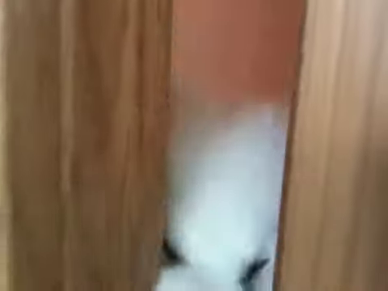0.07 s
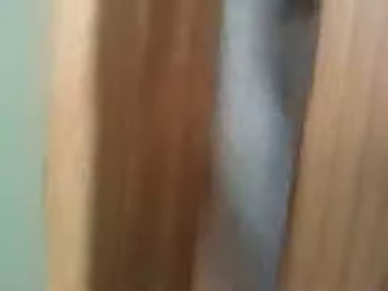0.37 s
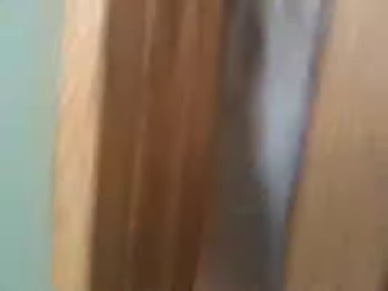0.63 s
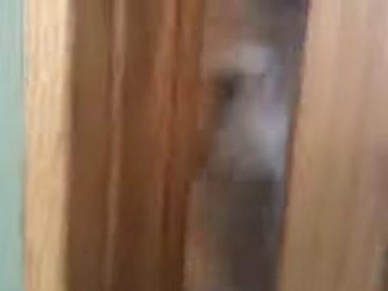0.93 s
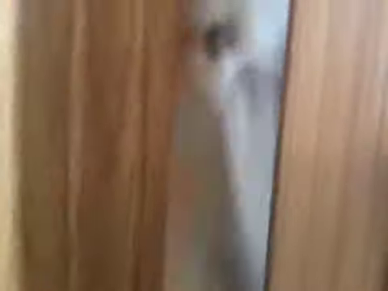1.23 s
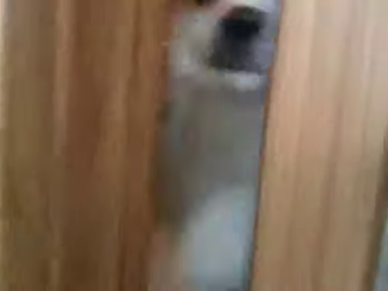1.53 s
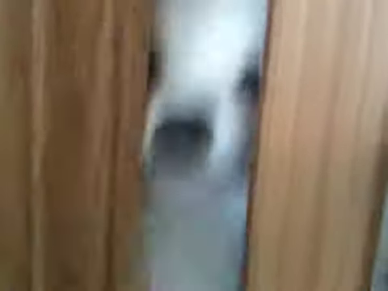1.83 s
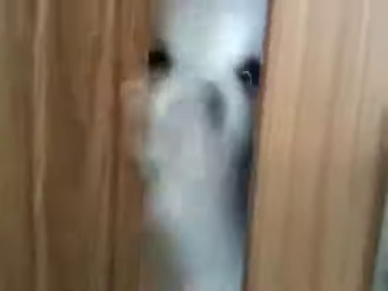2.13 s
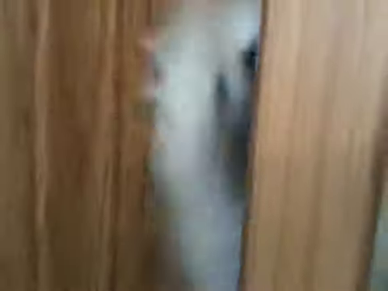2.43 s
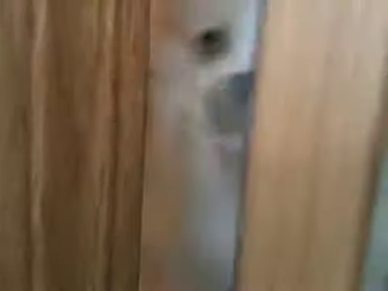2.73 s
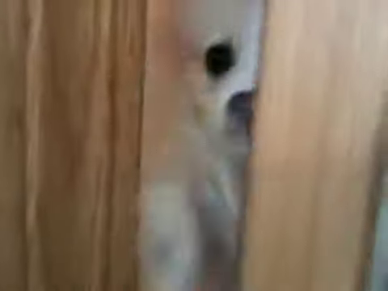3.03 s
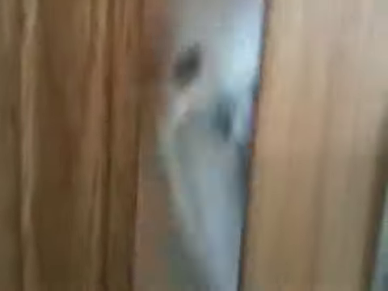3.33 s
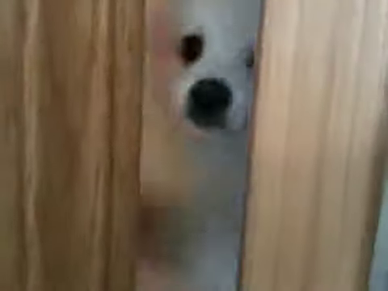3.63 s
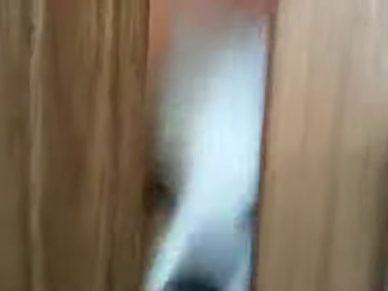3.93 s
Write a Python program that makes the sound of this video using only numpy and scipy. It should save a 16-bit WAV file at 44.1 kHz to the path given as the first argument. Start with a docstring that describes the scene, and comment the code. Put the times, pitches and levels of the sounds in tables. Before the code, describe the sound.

Close by in a quiet room, a puppy's claws scratch a wooden door over a soft shuffle of fur. Hollow paw knocks and thin, warbling whimpers join in and grow louder, ending with a hard knock and dull bumps.

```python
"""A small quiet room, one microphone close to a puppy scrabbling between two wooden door panels.
Over a shuffle of fur and paws, claws first scrape and tick on the wood, then paws start to knock the
panel. From about 0.6 s the puppy gives short, thin, warbling whines between strokes. Knocks and whines
grow louder towards the middle; now and then a claw squeals or the body bumps the door. Late on the
whines turn lower and fainter, and the hardest knock and two bumps come just before the end at 4 s."""
import sys
import numpy as np
from scipy import signal
from scipy.fft import rfft, irfft, next_fast_len
from scipy.io import wavfile
from scipy.ndimage import uniform_filter1d, map_coordinates

SR = 44100
rng = np.random.default_rng(int(sys.argv[2]) if len(sys.argv) > 2 else 0)


def to_wav(sig):
    """Store sig (one row per channel, or 1-D mono) as 16-bit WAV at the path in sys.argv[1].

    Samples outside -1..1 are clipped; the rate is SR.
    """
    pcm = np.clip(np.atleast_2d(sig), -1, 1) * 32767
    pcm = np.round(pcm).astype(np.int16)
    wavfile.write(sys.argv[1], SR, pcm.T)  # frames by channels


N = 176400
T = np.arange(N) / SR

# resonances of the door panel: centre_hz, width_hz, scraped_db, struck_db
PANEL_MODES = [(498, 37, -6, -23), (753, 113, -2.5, -4.5), (1290, 186, -15.5, -8), (1740, 260, -2, 0.5),
               (2178, 113, -1, -7.5), (2780, 270, -2, -8), (3543, 204, -0.5, -11), (4160, 320, 1.5, -9),
               (6870, 1200, -7, -17), (7580, 490, -2.5, -22), (10730, 690, -8, -18)]
# broad spectrum of a claw on wood: frequency_hz, level_db
CLAW_COLOUR = [(60, -62), (200, -17), (1000, -9), (3000, -6), (5300, -6.5), (7000, -6), (12600, -9.5),
               (15000, -17), (16000, -35)]


def amp(db):
    """Decibels to gain."""
    return 10 ** (np.asarray(db) / 20)


def unit(x):
    """Scale to rms 1."""
    return x / np.sqrt(np.mean(x ** 2) + 1e-20)


def along(points, hz):
    """Read (frequency_hz, value) points on a log frequency axis."""
    point_hz, values = np.transpose(points)
    return np.interp(np.log(hz + 1), np.log(point_hz + 1), values)


def wobble(rate):
    """A smooth random curve, rate knots a second."""
    return map_coordinates(rng.standard_normal(int(N * rate / SR) + 4), [T * rate])


def filtered(x, response):
    """Filter x by a gain given as a function of frequency."""
    size = next_fast_len(N + SR // 2)
    return irfft(rfft(x, size) * response(np.fft.rfftfreq(size, 1 / SR)), size)[:N]


def noise(colour):
    """Coloured noise of rms 1."""
    return unit(filtered(rng.standard_normal(N), lambda hz: amp(along(colour, hz))))


def add(out, start_s, x):
    """Mix x into out from start_s."""
    i = max(round(start_s * SR), 0)
    out[i:i + len(x)] += x[:max(N - i, 0)]


def grit(count, smooth, slips_per_s=3600):
    """Friction force of rms 1: tiny slips of random size over a smooth rub."""
    slips = (rng.random(count) < slips_per_s / SR) * rng.standard_normal(count)
    return unit(unit(slips) + smooth * rng.standard_normal(count))


def catches(x, depth_db):
    """Each brief catch of a claw stresses its own narrow bands, so the colour keeps shifting."""
    spectrum = signal.stft(x, SR, nperseg=256)[2]
    stress = uniform_filter1d(rng.standard_normal(spectrum.shape), size=3, axis=0)
    stress = unit(uniform_filter1d(stress, size=5, axis=1))
    gain = amp(depth_db * np.clip(stress, -2, 2))
    return signal.istft(spectrum * unit(gain), SR, nperseg=256)[1][:N]


def panel_ring(colour, spot_db, tilt_db=0, struck=False, size=2048):
    """The panel's impulse response, energy 1; each spot of contact weights the resonances anew."""
    hz = np.fft.rfftfreq(size, 1 / SR)
    power = amp(along(colour, hz)) ** 2
    for centre_hz, width_hz, scraped_db, struck_db in PANEL_MODES:
        mode_db = (struck_db if struck else scraped_db) + spot_db * rng.standard_normal()
        power += amp(mode_db) ** 2 / (1 + ((hz - centre_hz) / width_hz) ** 2) ** 2
    gain = np.sqrt(power) * amp(tilt_db * np.log2(1 + hz / 2500))
    # minimum phase: the ring starts at the contact
    cepstrum = irfft(np.log(gain + 1e-6))
    cepstrum[1:size // 2] *= 2
    cepstrum[size // 2 + 1:] = 0
    ring = irfft(np.exp(rfft(cepstrum)))
    return ring / np.linalg.norm(ring)


def room_tail(x):
    """The small room answers 5 ms later with a short diffuse tail whose treble dies first."""
    hz, t, spectrum = signal.stft(rng.standard_normal(SR // 2), SR, nperseg=256)
    t60_s = along([(1500, 0.48), (5000, 0.23), (14000, 0.17)], hz)
    tail = signal.istft(spectrum * amp(-60 * t / t60_s[:, None]), SR, nperseg=256)[1]
    return signal.fftconvolve(x, np.pad(tail, (SR // 200, 0)) / np.linalg.norm(tail))[:N]


def shuffle():
    """Restless fur and paws under everything."""
    # paws on the floor and the still room: frequency_hz, level_db
    colour = [(25, -26), (85, -14), (125, -3.5), (220, 2), (380, -7), (700, -8.5), (1100, -10), (4000, -9),
              (8000, -13), (16000, -24.5)]
    # rise and fall of the shuffling: time_s, level_db
    contour = [(0, -51), (.17, -62), (.31, -61.5), (.37, -56), (.42, -54), (1.02, -58), (2.25, -52),
               (3.08, -56), (3.4, -55), (3.78, -56.5), (4, -45.5)]
    rustle = catches(noise(colour), depth_db=3.5)
    return rustle * amp(np.interp(T, *np.transpose(contour)) + 3.0 * wobble(35.13))


def body_bumps(attack_s=0.00082, t60_s=0.24):
    """The body bumps the door with soft, dull thuds."""
    # thuds of the door: start_s, level_db
    thuds = [(0.788, -49), (1.69, -48.5), (2.196, -39), (2.229, -46.5), (3.938, -45), (3.973, -41)]
    # spectrum of a thud: frequency_hz, level_db
    colour = [(30, -35), (90, -30), (130, -8), (235, 2.5), (350, -6.5), (5000, -44)]
    envelope = np.zeros(N)
    for start_s, level_db in thuds:
        age = np.maximum(T - start_s, 0)
        envelope += amp(level_db - 60 * age / t60_s) * (1 - np.exp(-age / attack_s))
    return noise(colour) * envelope


def claw_squeals(half_length_s=0.0043, wander=0.018):
    """Stick and slip locks for a moment onto one unsteady note."""
    # a claw sticks: centre_s, pitch_hz, level_db
    squeals = [(.54, 4180, -35.5), (.902, 6160, -39), (2.092, 3880, -30.5), (2.342, 3790, -36),
               (2.666, 7680, -37), (3.266, 4240, -33), (3.579, 3675, -31.5), (3.915, 4250, -35)]
    out = np.zeros(N)
    for centre_s, pitch_hz, level_db in squeals:
        phase = 2 * np.pi * np.cumsum(pitch_hz * (1 + wander * wobble(900))) / SR
        envelope = np.exp(-((T - centre_s) / half_length_s) ** 2)
        out += amp(level_db) * np.sqrt(2) * np.sin(phase) * envelope
    return out


def claw_scrapes(rise_db_per_s=819, fall_db_per_s=1115, sag_db=1):
    """Each stroke presses in, chatters over the grain of the wood and lifts off."""
    # claws and pads dragged over the wood: start_s, length_s, level_db, tilt_db
    strokes = [(.002, 0.14, -47, 0), (0.389, 0.03, -46, -4), (0.521, 0.046, -35, 1),
               (0.785, 0.017, -33.5, -2.5), (0.882, 0.035, -38, -1.5), (0.923, 0.0031, -33.5, 9),
               (1.105, 0.034, -51, -4), (1.186, 0.038, -37, 2.5), (1.232, .002, -35, 11.5),
               (1.35, 0.013, -34.5, -2.5), (1.518, 0.0077, -31, -2.5), (1.7, 0.014, -32, -1),
               (1.775, 0.024, -39, 2), (1.83, 0.066, -46, -0.5), (1.986, 0.0095, -37, -1.5),
               (2.094, 0.0094, -27.5, -0.5), (2.129, 0.022, -34.5, 2.5), (2.337, 0.005, -33.5, 0.5),
               (2.366, 0.033, -40, 2), (2.398, 0.139, -49.5, 3.5), (2.625, 0.022, -42.5, -2.5),
               (2.644, 0.027, -33.5, 1.5), (2.782, 0.0092, -39, 0.5), (2.856, 0.039, -48, -6),
               (2.943, 0.0036, -29.5, -3), (3.264, 0.03, -31.5, 1), (3.352, 0.015, -40.5, 0.5),
               (3.427, 0.018, -36.5, -3), (3.574, 0.015, -33.5, -1.5), (3.889, 0.05, -38.5, 3)]
    out = np.zeros(N)
    chatter = grit(N, smooth=0.73) * amp(2.2 * wobble(260))
    force = catches(chatter, depth_db=3.8)
    for start_s, length_s, level_db, tilt_db in strokes:
        on = (T > start_s - .06) & (T < start_s + length_s + .06)
        t = T[on] - start_s
        press_db = sag_db * (.5 - np.clip(t / length_s, 0, 1))
        press_db += rise_db_per_s * np.minimum(t, 0) - fall_db_per_s * np.maximum(t - length_s, 0)
        ring = panel_ring(CLAW_COLOUR, spot_db=1.6, tilt_db=tilt_db)
        add(out, T[on][0], signal.fftconvolve(force[on] * amp(level_db + press_db), ring))
    return out


def claw_ticks(bite_s=0.0069, t60_s=0.016, boost_db=25.5):
    """A hard claw tip bites in and skitters for a few milliseconds."""
    # a tip lands or snaps off the edge: time_s, relative_db, tilt_db
    ticks = [(0.033, -40, 2.5), (0.122, -39.5, 1), (0.261, -52, -7), (.441, -45, 7), (.789, -23.5, 0.5),
             (0.806, -36, 11), (1.072, -43, 3), (1.2348, -39, 9), (1.3204, -37.5, 1.5), (1.6994, -26.5, 3),
             (1.8458, -33, 7), (2.193, -33.5, 7), (2.3279, -31, 2.5), (2.4749, -25.5, 1),
             (2.644, -24.5, 13.5), (3.1, -42.5, 4.5), (3.181, -38, 20), (3.195, -39.5, 4),
             (3.822, -48.5, 5.5), (3.937, -24, -3)]
    lead_s, peak_delay_s = .008, 0.0013
    out, t = np.zeros(N), T[:SR // 20]
    envelope = amp(-60 * np.abs(t - lead_s) / np.where(t < lead_s, bite_s, t60_s))
    for time_s, relative_db, tilt_db in ticks:
        force = grit(len(t), smooth=1.0) * envelope
        ring = panel_ring(CLAW_COLOUR, spot_db=2.5, tilt_db=tilt_db)
        tick = signal.fftconvolve(force / np.linalg.norm(force), ring)
        add(out, time_s - lead_s + peak_delay_s, amp(relative_db + boost_db) * tick)
    return catches(out, depth_db=1.0)


def paw_knocks(attack_s=0.00049, clatter_t60_s=0.02, note_t60_s=0.03, note_db=1.5):
    """A paw rings the panel's hollow note while its claws clatter on the higher resonances."""
    # strikes, each on its own spot: start_s, relative_db, pitch_hz, clatter_db
    knocks = [(0.403, -37.5, 760, 18.5), (0.552, -35.5, 744, -1), (0.789, -28, 645, 20),
              (1.196, -35.5, 760, 21.5), (1.362, -31, 750, 18.5), (1.533, -27.5, 780, 14),
              (1.704, -20.5, 753, 19.5), (1.98, -43, 740, 10), (2.094, -34.5, 918, 27),
              (2.196, -27.5, 740, 18), (2.23, -21.5, 803, 20.5), (2.484, -25.5, 753, 9),
              (2.662, -32.5, 773, 10), (2.949, -24, 842, 22.5), (3.146, -27.5, 789, 22),
              (3.444, -31, 770, 10), (3.59, -25, 750, 22.5), (3.89, -31.5, 778, 25.5),
              (3.935, -17, 757, 20.5)]
    # broad spectrum of the clatter: frequency_hz, level_db
    colour = [(60, -38), (280, -35), (3000, -32), (16000, -45)]
    out, t = np.zeros(N), T[:SR // 10]
    rise = 1 - np.exp(-t / attack_s)
    for start_s, relative_db, pitch_hz, clatter_db in knocks:
        force = grit(len(t), smooth=0.53) * amp(-60 * t / clatter_t60_s) * rise
        clatter = signal.fftconvolve(force, panel_ring(colour, spot_db=2, struck=True))[:len(t)]
        clatter *= amp(clatter_db) / np.linalg.norm(clatter)
        note = np.sin(2 * np.pi * pitch_hz * t) * amp(note_db - 60 * t / note_t60_s) * rise
        add(out, start_s, amp(relative_db) * (note + clatter))
    return out


def whines(attack_s=.006, release_s=0.0042, octave_db=-43, trim_db=-1):
    """A nearly pure whistle from the puppy's throat, with slight flutter and a faint octave."""
    # one list of points per whine: time_s, pitch_hz, relative_db
    contours = [
        [(0.624, 1650, -40), (0.631, 1710, -30), (0.65, 1750, -29), (0.658, 1770, -42)],
        [(0.735, 1682, -43), (0.745, 1800, -25.5), (0.762, 1820, -30), (0.785, 1854, -33), (0.803, 1835, -39),
         (0.822, 1776, -26.5), (0.836, 1630, -37)],
        [(1.246, 1630, -39), (1.258, 1646, -33.5)],
        [(1.584, 1690, -31.5), (1.589, 1757, -22.5), (1.608, 1690, -27), (1.619, 1770, -36)],
        [(1.695, 1668, -27), (1.711, 1753, -26), (1.718, 1478, -29.5), (1.736, 1532, -26.5),
         (1.748, 1705, -24.5), (1.77, 1630, -32)],
        [(2.213, 1632, -23), (2.228, 1737, -22), (2.251, 1540, -27.5)],
        [(2.309, 1607, -25.5), (2.319, 1402, -29.5), (2.331, 1628, -25), (2.343, 1644, -29)],
        [(2.396, 1642, -26), (2.414, 1447, -24), (2.425, 1520, -27)],
        [(2.496, 1503, -28), (2.503, 1378, -30), (2.53, 1350, -35.5)],
        [(2.603, 1553, -33.5), (2.618, 1390, -31), (2.627, 1560, -29.5), (2.634, 1520, -43)],
        [(3.143, 1685, -30), (3.151, 1687, -24.5), (3.157, 1418, -36.0), (3.166, 1660, -25.5),
         (3.175, 1783, -29.5), (3.197, 1733, -25), (3.216, 1507, -39)],
        [(3.509, 1587, -32), (3.522, 1310, -37.5), (3.533, 1334, -40), (3.544, 1613, -30), (3.559, 1540, -37)],
        [(3.616, 1554, -33), (3.62, 1400, -34.5), (3.648, 1250, -37), (3.666, 1240, -40.5)],
        [(3.72, 1386, -34.5), (3.724, 1434, -38), (3.739, 1230, -38), (3.754, 1370, -39.5),
         (3.768, 1240, -41.5)],
        [(3.847, 1480, -36.5), (3.851, 1367, -36.5), (3.87, 1375, -37.5), (3.884, 1585, -29), (3.89, 1500, -38)],
    ]
    out = np.zeros(N)
    flutter = 1 + 0.0061 * wobble(300)
    shimmer_db = .8 * wobble(250)
    for points in contours:
        time_s, pitch_hz, relative_db = np.transpose(points)
        gate = np.clip((T - time_s[0]) / attack_s + 1, 0, 1)
        gate *= np.clip((time_s[-1] - T) / release_s + 1, 0, 1)
        on = gate > 0
        phase = 2 * np.pi * np.cumsum(np.interp(T[on], time_s, pitch_hz) * flutter[on]) / SR
        tone = np.sin(phase) + amp(octave_db) * np.sin(2 * phase)
        level_db = np.interp(T[on], time_s, relative_db) + trim_db + shimmer_db[on]
        out[on] += np.sqrt(2) * tone * np.sin(np.pi / 2 * gate[on]) ** 2 * amp(level_db)
    return out


def scene():
    """Puppy and door close to the microphone, with a little of the room behind them."""
    wood = claw_scrapes() + claw_squeals() + claw_ticks() + paw_knocks() + body_bumps()
    voice = whines()
    reverb = amp(-16) * room_tail(wood + amp(-4.5) * voice)
    return (wood + voice + reverb + shuffle())[None]


def record(dry):
    """The mono recorder keeps nothing above 16.2 kHz."""
    return filtered(dry[0], lambda hz: hz < 16200)[None]


dry = scene()
out = record(dry)
to_wav(out)
```